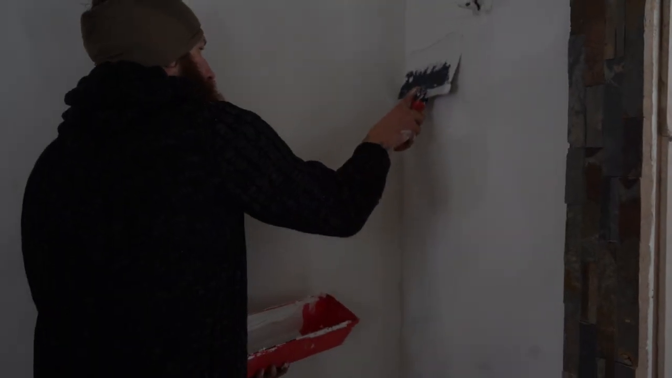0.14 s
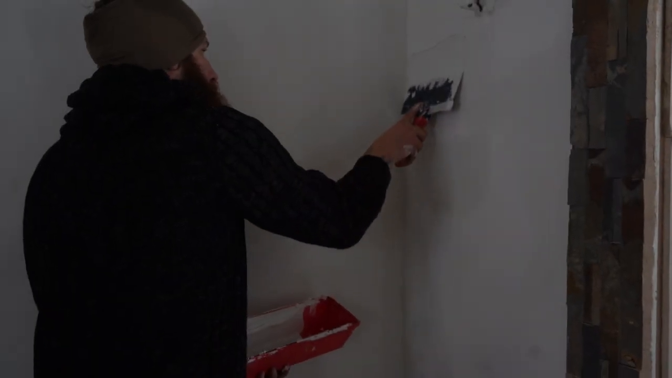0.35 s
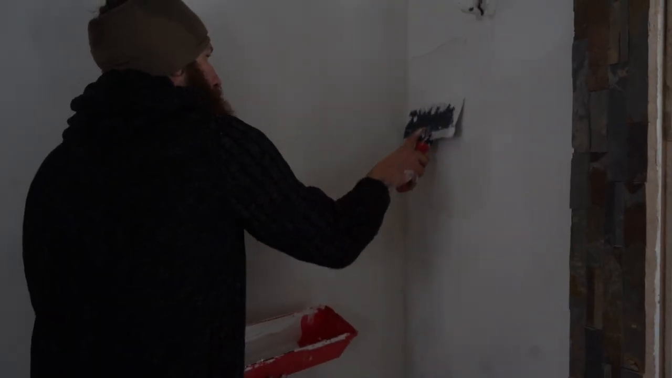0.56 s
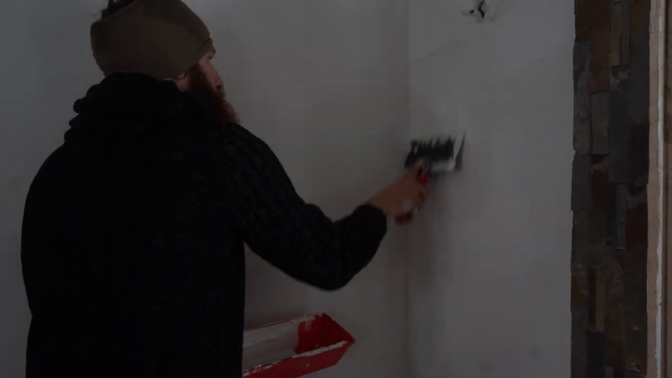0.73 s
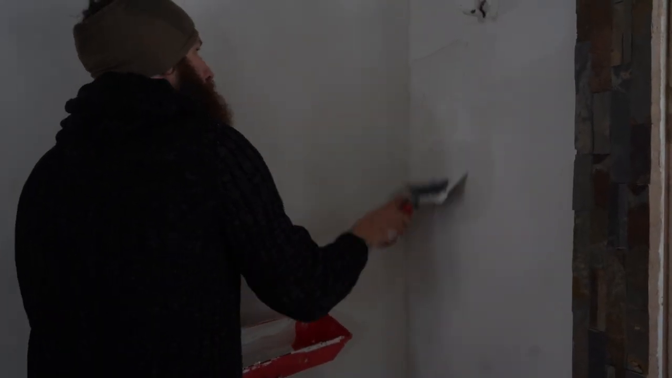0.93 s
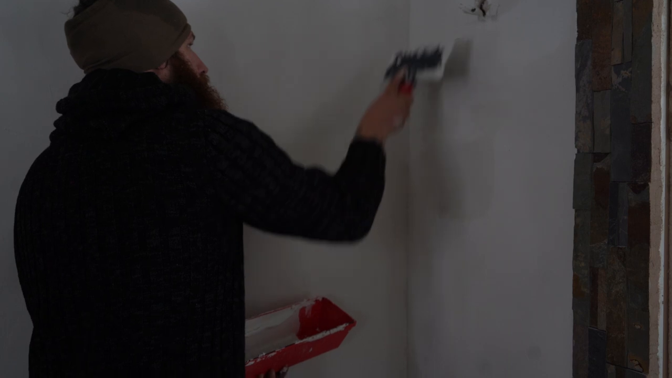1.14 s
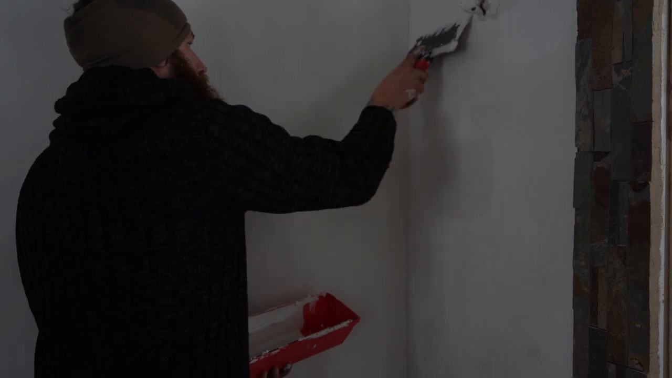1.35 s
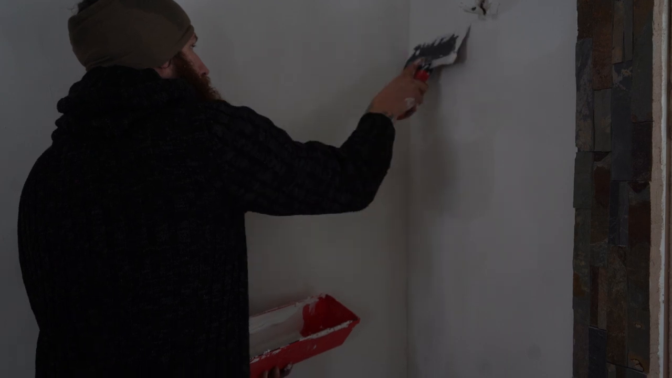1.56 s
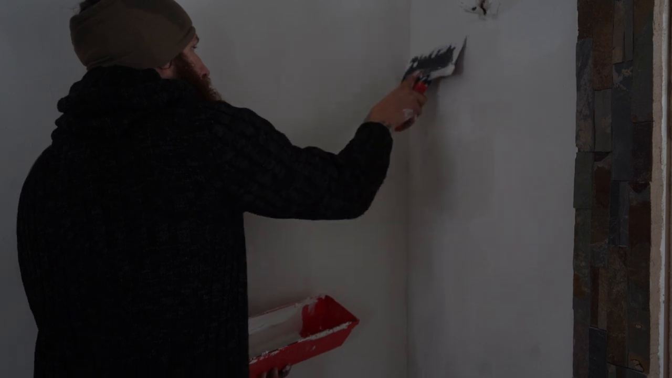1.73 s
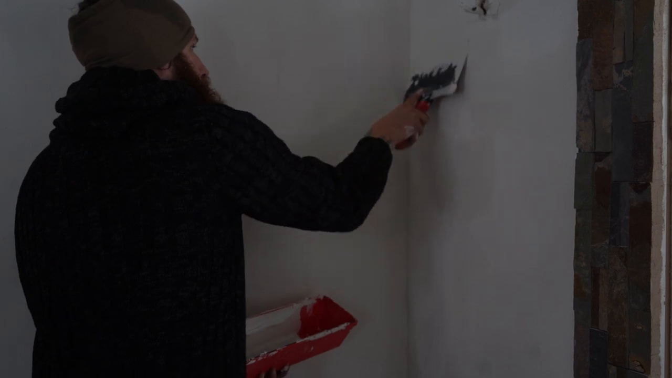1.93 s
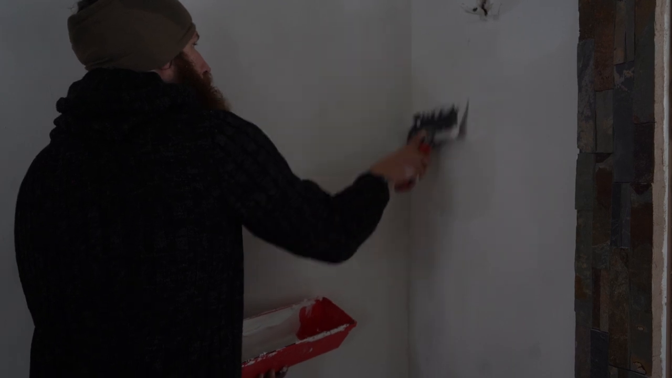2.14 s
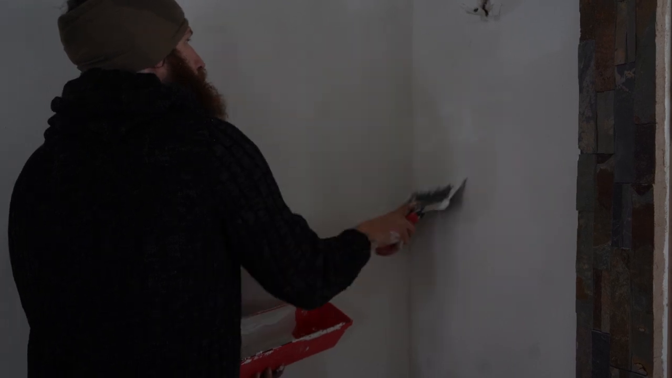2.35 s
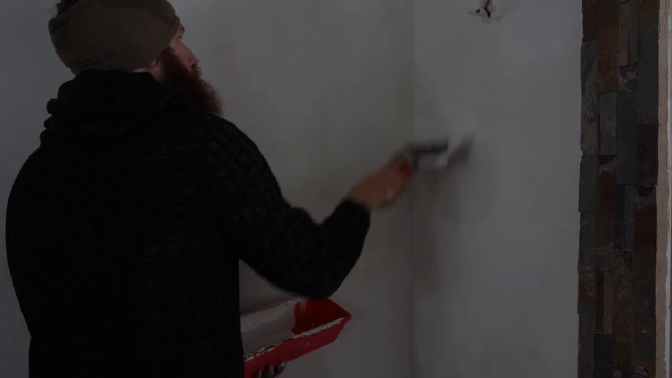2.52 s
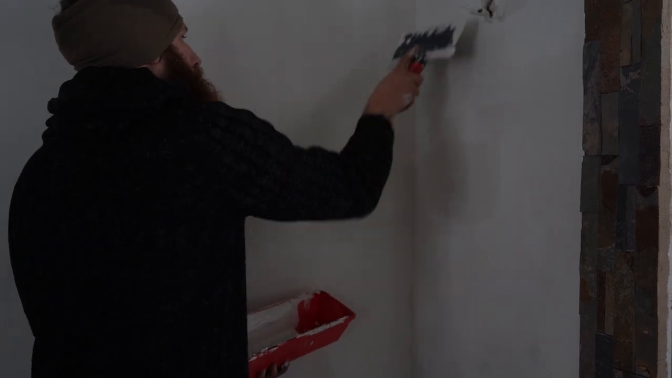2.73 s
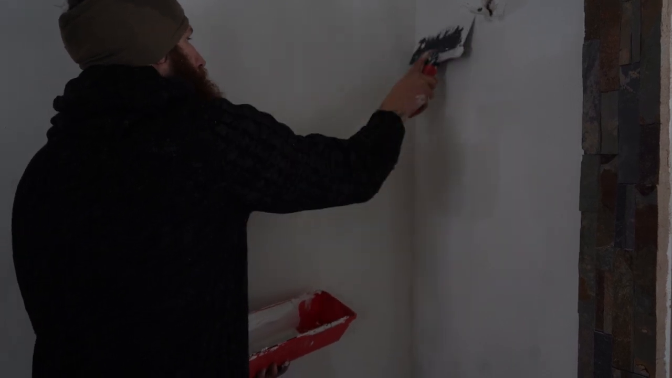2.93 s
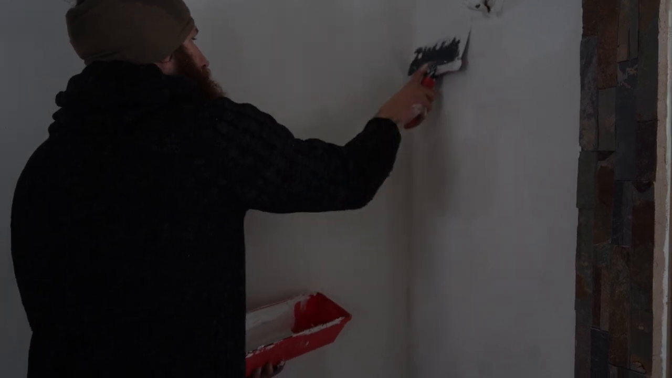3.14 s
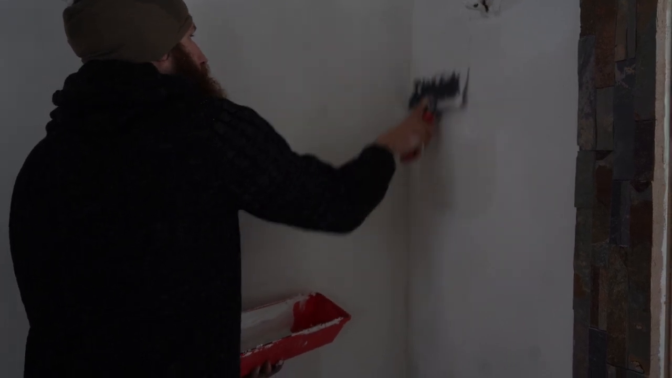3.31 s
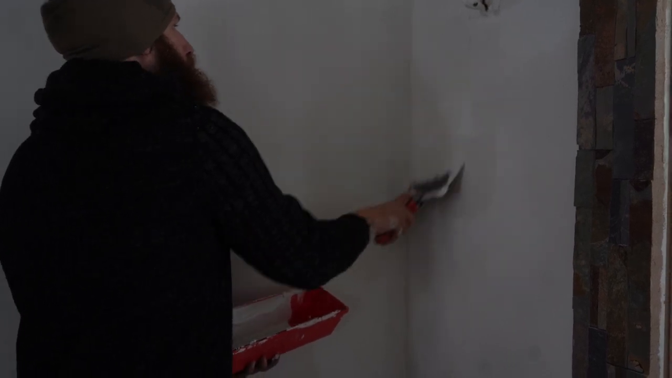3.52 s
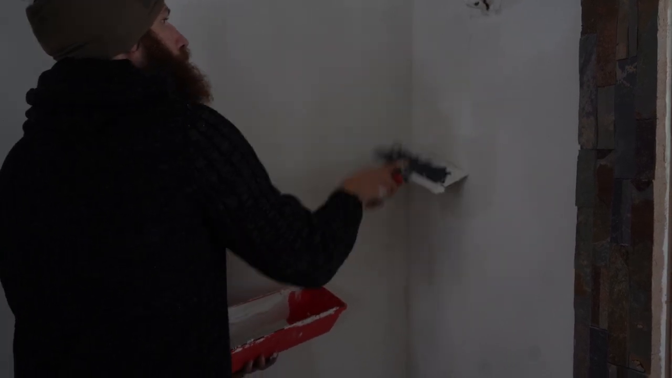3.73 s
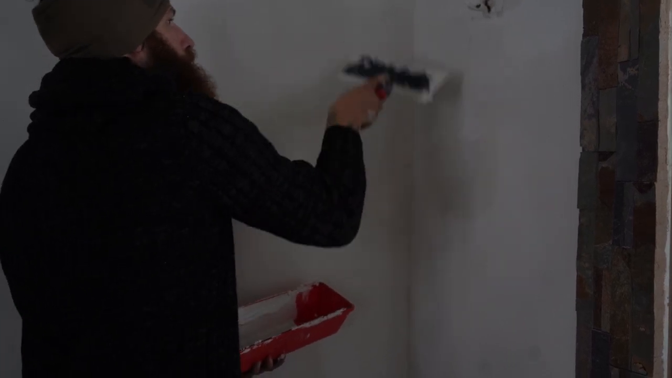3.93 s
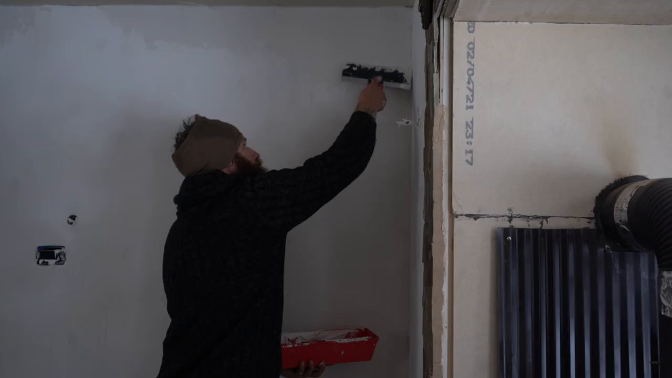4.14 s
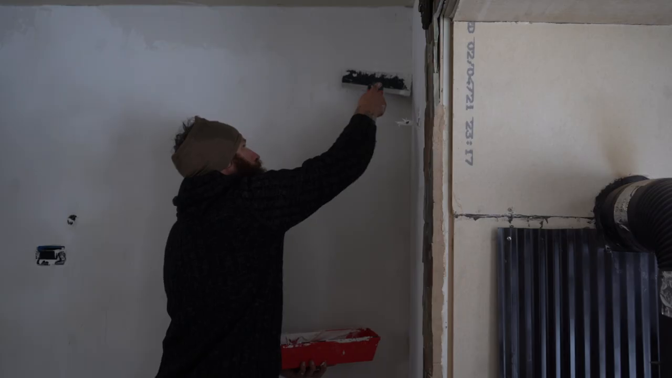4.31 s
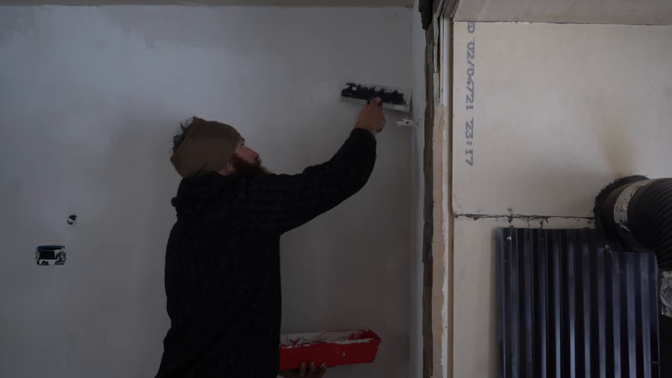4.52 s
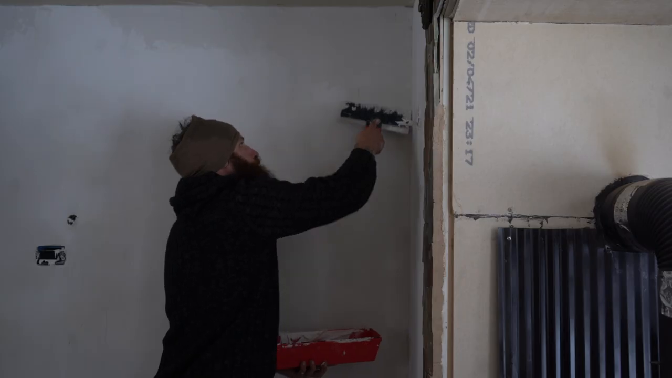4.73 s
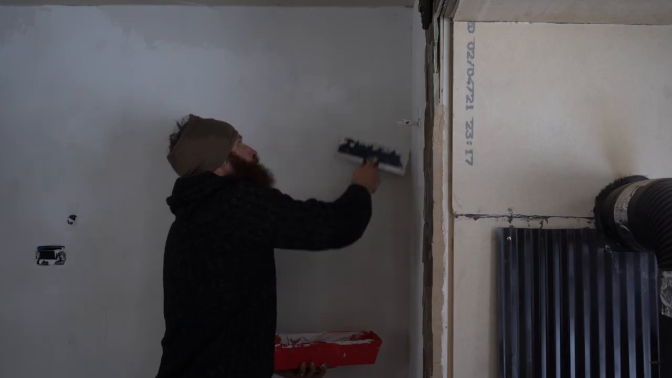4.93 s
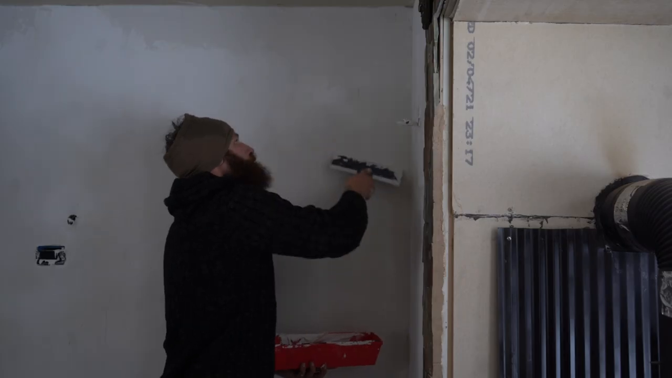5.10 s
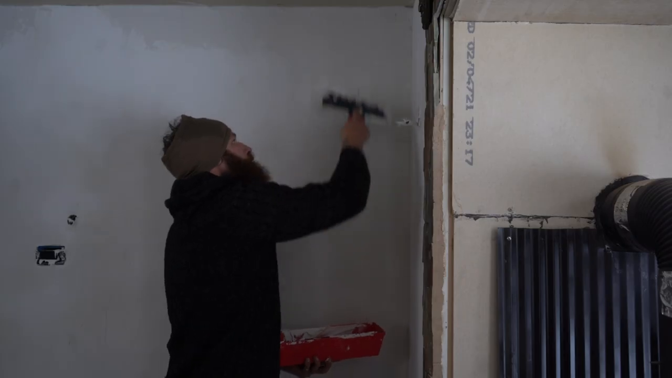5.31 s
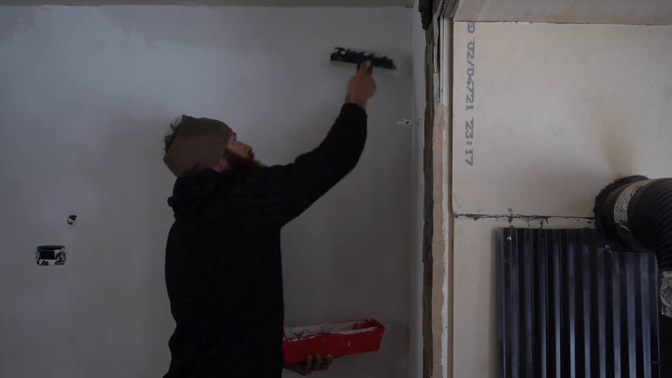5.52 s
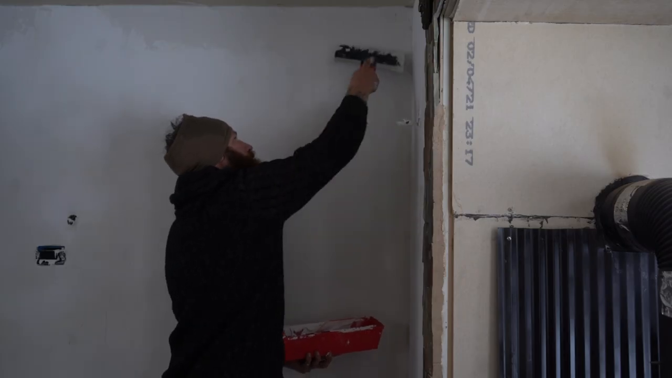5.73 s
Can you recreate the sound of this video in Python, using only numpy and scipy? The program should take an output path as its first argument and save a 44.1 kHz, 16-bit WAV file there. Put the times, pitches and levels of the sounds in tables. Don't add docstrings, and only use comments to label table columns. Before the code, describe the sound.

A steel taping knife works gritty compound on a plasterboard wall in a small, hard, briefly reverberant room, miked fairly close. Over a quiet hush with barely audible low air heaves, a faint drag swells from the start into a loud rasping flick at 0.75-0.9 s. The knife knocks the hollow panel at 1.33 s, drags softly, then flicks harder at 2.17-2.35 s, with brief metallic ringing. Another set-down and bounce come at 2.87 s; a short drag with crisp lump snaps at 3.2-3.4 s bursts into the hardest flick, around 3.4-3.55 s. Soft hollow bumps follow at 3.67 and 3.8 s, then a very faint, high gliding squeak at 3.86-4.08 s. At 4.17 s the background cuts abruptly to a steady low appliance drone with soft hiss. A fainter, farther drag has a snap near 4.5 s and flicks off at 4.85-5.15 s, leaving drone and tiny ticks.

```python
import sys
import numpy as np
from scipy import signal
from scipy.fft import rfft, irfft, next_fast_len
from scipy.io import wavfile
from scipy.ndimage import uniform_filter1d, map_coordinates

SR = 44100
rng = np.random.default_rng(int(sys.argv[2]) if len(sys.argv) > 2 else 0)


def linear_from_db(decibels):
    return 10 ** (np.asarray(decibels, float) / 20)


def store_wav(level_fs):
    pcm = np.round(np.clip(np.atleast_2d(level_fs), -1, 1) * 32767)
    wavfile.write(sys.argv[1], SR, pcm.T.astype(np.int16))


N = 258426
SCENE_CHANGE_S = 4.1714


def unit(x):
    return x / np.sqrt(np.mean(x ** 2) + 1e-20)


def along(points, hz):
    f, value = np.transpose(points)
    return np.interp(np.log(hz + 1), np.log(f + 1), value)


def wobble(rate, count=N):
    knots = rng.standard_normal(int(N * rate / SR) + 4)
    return map_coordinates(knots, [np.arange(count) * rate * N / count / SR])


def filtered(x, response):
    m = next_fast_len(N + SR // 2)
    return irfft(rfft(x, m) * response(np.fft.rfftfreq(m, 1 / SR)), m)[:N]


def shaped(x, curve):
    return unit(filtered(x, lambda hz: linear_from_db(along(curve, hz))))


def resonances(modes, f):
    total = 0
    for k, (centre, width, db) in enumerate(modes):
        damping = 1j * f * width
        total = total + (-1) ** k * linear_from_db(db) * damping / (centre * centre - f * f + damping)
    return total


def patchy(x, patchy_db):
    z = signal.stft(x, nperseg=512)[2]
    field = uniform_filter1d(rng.standard_normal(z.shape), 5, 0)
    field = uniform_filter1d(field, 8, 1)
    return signal.istft(z * linear_from_db(patchy_db * unit(field)), nperseg=512)[1][:N]


def heave():
    # f/Hz, level/dB per Hz
    pressure = [(3, -28), (7, -5), (12, -3.5), (17, -4.5), (23, -19), (30, -46.5), (45, -72), (80, -120)]
    # middle t/s, length/s, level/dB
    swells = [(0.172, 0.37, -28), (.4, 0.11, -23.5), (1.203, 0.089, -29), (1.527, 0.079, -36),
              (1.855, 0.14, -27.5), (2.034, 0.085, -31), (2.561, 0.1, -24), (2.8, 0.096, -23.5),
              (3.207, 0.075, -31), (3.602, 0.17, -30.5), (3.99, 0.15, -29)]
    s = np.arange(N) / SR
    roll = filtered(rng.standard_normal(N), lambda hz: linear_from_db(along(pressure, hz)))
    loudness = uniform_filter1d(uniform_filter1d(unit(roll) ** 2, size=4000), size=4000)
    roll = unit(roll / np.sqrt(np.abs(loudness) + 0.054))
    power = linear_from_db(np.where(s < SCENE_CHANGE_S, -38.5, -45.5)) ** 2
    for at, length, db in swells:
        power = power + linear_from_db(db) ** 2 * np.exp(-(2 * (s - at) / length) ** 2)
    opening_s = 0.026
    crest = linear_from_db(-29) * np.exp(-(s / opening_s) ** 2)
    return np.sqrt(uniform_filter1d(power, size=2200)) * roll * (1 - np.exp(-s / opening_s)) + crest


def near_hush():
    # f/Hz, level/dB per Hz
    quiet = [(26, -33), (45, -1), (59, -13.5), (91, -14.5), (157, -17), (181, -21), (243, -17.5),
             (483, -33), (573, -29), (1420, -39.5), (2420, -37), (5600, -45.5), (15600, -61.5)]
    return linear_from_db(-56.5) * shaped(patchy(rng.standard_normal(N), patchy_db=0.7), quiet)


def far_drone():
    # f/Hz, level/dB per Hz
    hum = [(18, -54), (30, 8), (110, -1.5), (150, -12.5), (200, -5), (260, -15), (430, -18), (800, -19.5),
           (1300, -24.5), (2500, -28.5), (4000, -31), (5500, -32), (7000, -40), (15600, -44)]
    # f/Hz, width/Hz, level/dB over the drone
    casing = [(201, 11, 2.5), (438, 50, 4), (588, 41, 9), (924, 20.4, 13.5), (2010, 37, 4.5),
              (2500, 97, 11)]

    def response(hz):
        power = 1 + sum(np.abs(resonances([mode], hz)) ** 2 for mode in casing)
        return linear_from_db(along(hum, hz)) * np.sqrt(power)

    return linear_from_db(-56) * unit(filtered(patchy(rng.standard_normal(N), patchy_db=1.9), response))


def background():
    s = np.arange(N) / SR
    far = s >= SCENE_CHANGE_S
    jump = -linear_from_db(-41) * far * np.exp(-np.abs(s - SCENE_CHANGE_S) / 0.0066)
    return heave() + jump + np.where(far, far_drone(), near_hush())


def squeak():
    # t/s, f/Hz
    glide = [
        (3.86, 12700),
        (3.91, 13400),
        (3.955, 12620),
        (4.01, 12800),
        (4.08, 12200),
    ]
    s = np.arange(N) / SR
    at, hz = np.transpose(glide)
    upper = uniform_filter1d(np.interp(s, at, hz), size=900)
    lower = upper * (0.758 - 0.22 * np.clip(s - at[0], 0, 1))
    on = uniform_filter1d(1. * ((s > at[0]) & (s < at[-1])), size=1300)
    tones = 0
    for f in (upper, lower):
        level_db = -86 + 4.5 * wobble(60) - 45 * np.clip(s - 4.0, 0, 1)
        tones = tones + linear_from_db(level_db) * np.sin(2 * np.pi * np.cumsum(f) / SR)
    return on * tones


def room(x):
    # f/Hz, t60/s
    decay = [(150, 0.67), (1000, 0.27), (4000, 0.31), (12000, 0.26)]
    out, hop = np.zeros(N + SR), SR // 3
    for start in range(0, N, hop):
        hz, t, z = signal.stft(rng.standard_normal(SR // 2), SR, nperseg=256)
        fade = linear_from_db(-60 * t / along(decay, hz)[:, None])
        tail = signal.istft(z * fade, SR, nperseg=256)[1]
        wet = signal.fftconvolve(x[start:start + hop], tail / np.linalg.norm(tail))
        out[start + 200:][:len(wet)] += wet
    return out[:N]


def snaps():
    # t/s, peak level/dB, t60/s, brightness f/Hz
    lumps = [(.4703, -36, 0.0253, 5000), (1.9986, -37, .028, 5000), (2.061, -49, .03, 3000),
             (2.912, -52, 0.14, 8000), (2.96, -57, .1, 7000), (3.2001, -39.5, 0.026, 4020),
             (3.244, -28.5, 0.019, 5470), (3.29, -35, 0.021, 7000), (3.4033, -27, .05, 3600),
             (3.795, -28.5, 0.044, 3360), (4.341, -51, .025, 6000), (4.497, -33.5, 0.057, 3520),
             (4.8484, -45, 0.025, 5030), (5.4497, -55, 0.065, 4980), (5.826, -57, 0.04, 6000),
             (3.845, -49.5, .05, 4000)]
    out, t = np.zeros(N + SR), np.arange(SR // 8) / SR
    for s, db, t60, bright_hz in lumps:
        puff = linear_from_db(db - 7 - 60 * t / max(t60, .002)) * rng.standard_normal(len(t))
        band = signal.butter(2, [bright_hz / 4, min(bright_hz * 1.6, 19000)], "band", fs=SR)
        out[round(s * SR):][:len(t)] += signal.lfilter(*band, puff)
    return out[:N]


def knocks():
    # t/s, tick level/dB, panel level/dB re tick, rise/s, t60/s
    bumps = [
        (1.33, -42.5, 7, 0.0008, 0.066),
        (2.869, -42, 1.5, 0.0017, 0.11),
        (2.895, -59, 2, 0.0022, .06),
        (3.672, -47, 8.5, .025, 0.07),
        (3.798, -44, 11, 0.019, 0.051),
    ]
    # f/Hz, width/Hz, level/dB
    panel = [(88, 25, 8.5), (150, 40, 12), (203, 210, 0), (300, 40, -1), (463, 250, -4.5), (654, 140, -2),
             (976, 179, -5.5), (1970, 300, -18)]
    tick, push, t = np.zeros(N + SR), np.zeros(N + SR), np.arange(SR // 3) / SR
    for s, db, panel_db, rise, t60 in bumps:
        start = round((s - rise) * SR)
        swell = np.clip(t / max(rise, 1e-4), 0, 1) ** 2
        after = np.maximum(t - rise, 0)
        tick_env = swell * linear_from_db(db - 9.5 - 60 * after / max(0.82 * t60, .005))
        push_env = swell * linear_from_db(db + panel_db + 7 - 60 * after / max(1.4 * t60, .01))
        tick[start:][:len(t)] += tick_env * rng.standard_normal(len(t))
        push[start:][:len(t)] += push_env * rng.standard_normal(len(t))
    edge = filtered(tick[:N], lambda f: resonances([(3700, 6600, 0.022)], f))
    return edge + filtered(push[:N], lambda f: resonances(panel, f))


def thuds():
    # t/s, peak level/dB, f/Hz, t60/s
    rings = [(1.328, -34, 45.7, 0.22), (1.329, -33.5, 143, 0.112), (1.33, -30.5, 300, 0.039),
             (2.87, -41, 49, 0.52), (2.866, -28.5, 160, 0.034), (2.869, -48, 313, 0.064),
             (2.895, -32, 287, 0.035), (2.903, -43, 176, 0.16), (3.657, -35, 45, 0.45),
             (3.662, -35.5, 150, 0.044), (3.692, -36, 89, 0.22), (3.788, -35.5, 426, 0.033),
             (3.791, -32, 644, 0.033), (3.796, -33, 108, 0.093), (3.811, -44, 337, 0.079)]
    out, t = np.zeros(N + SR), np.arange(SR // 3) / SR
    for s, db, hz, t60 in rings:
        envelope = linear_from_db(db - 60 * t / t60) * (1 - np.exp(-t * hz * 3))
        out[round(s * SR):][:len(t)] += envelope * np.sin(2 * np.pi * hz * t)
    return out[:N]


def stroke_controls():
    # t/s, force level/dB, lay/dB (plus = blade flat on the board), dryness/dB
    drags = [
        [(0.02, -63, -5.5, 0), (0.2, -57, 0, -2), (0.28, -60, -0.5, 1.5), (0.56, -52.5, 0.5, 3.5),
         (0.606, -44, -1, 2), (0.735, -37.5, -2, -1.5)],
        [(1.35, -80, -7, 18), (1.4, -70.5, 2, 14), (1.53, -60.5, 1, 4.5), (1.61, -56, 3.5, 4),
         (1.74, -66, 3, 0), (1.83, -57.5, -3.5, -1), (1.906, -60.5, -1.5, -2), (2.14, -51.5, -2.5, 0)],
        [(2.89, -72, -2, 9), (3.0, -71.5, -7, 2.5), (3.126, -58.5, 0, 1), (3.198, -60.5, -0.5, 2.5),
         (3.28, -52, -1.5, 0), (3.385, -49.5, -2, 1.5)],
        [(4.22, -86, 0, -2), (4.28, -74.5, -0.5, 2), (4.42, -67, 0, 3), (4.62, -66, -2.5, 0),
         (4.835, -56, 0, 0)],
    ]
    # t/s, force level/dB, lay/dB, dryness/dB
    flicks = [
        [(0.765, -30, -0.5, -2.5), (0.792, -29.5, 1.5, -3), (0.834, -33, -9, 0), (0.87, -28.5, 1, 3),
         (1.0, -89.5, 13, -23), (1.1, -82, 2, -6)],
        [(2.17, -34, -5, -1), (2.192, -30.5, -1.5, -3), (2.25, -25, 1, -2), (2.304, -31.5, -9, 4.5),
         (2.354, -33.5, 4, 1.5), (2.47, -67, 2, -4), (2.61, -68, -8, -7), (2.65, -80, 8, -9)],
        [(3.402, -26, -9, -3), (3.42, -24.5, -1.5, -4.5), (3.46, -22, -5, 3.5), (3.488, -30.5, -7, 10),
         (3.554, -39.5, 6, 3.5), (3.704, -76.5, -5, -8), (3.8, -58, 9, -5), (3.86, -66, -0.5, -13.5),
         (4.16, -80.5, 4.5, -14)],
        [(4.853, -51, 0.5, 5), (4.883, -47, 6, -4.5), (5.03, -51, 12.5, -5), (5.067, -49.5, 9.5, -6),
         (5.187, -71, 3, -4), (5.25, -73.5, 1, -12)],
    ]
    # drag level/dB, flick level/dB
    spots = [
        (2, -4.5),
        (1, 1.3),
        (-0.5, 3.5),
        (-4, -3.5),
    ]
    strokes = [drag + flick for drag, flick in zip(drags, flicks)]
    s, *cols = np.concatenate(strokes).T
    counts = [len(part) for pair in zip(drags, flicks) for part in pair]
    cols.append(np.repeat(np.ravel(spots), counts))
    now = np.arange(N) / SR
    force_db, lay_db, dry_db, spot_db = (np.interp(now, s, col) for col in cols)

    lifted = now > s[-1]
    for a, b in zip(strokes, strokes[1:]):
        leave, land = a[-1][0], b[0][0]
        if land - leave > .15:
            lifted = lifted | ((now > leave) & (now < land))
    blade_db = force_db - 40 * uniform_filter1d(1. * lifted, 400)

    over_db = force_db + 50
    board_db = -4.5 - 0.13 * over_db + 0.96 * lay_db
    grit_db = -8.5 - 0.086 * over_db + 0.77 * dry_db
    hollow_db = -10.5 - 0.39 * over_db + 0.78 * lay_db + spot_db
    return blade_db, board_db, grit_db, hollow_db


def flexing_blade(x, ring_db):
    # f/Hz, width/Hz, level/dB (unused: every mode rings at the same strength)
    blade_modes = [(1117, 110, -6), (1620, 150, -6), (1930, 130, -5), (2650, 130, -1), (3100, 70, 0),
                   (3620, 120, -1), (5550, 95, -3), (7040, 100, -11)]
    # middle t/s, length/s, f/Hz, level/dB over the scrape
    sings = [(0.284, 0.22, 1960, 8.5), (0.546, 0.088, 3900, 5), (0.65, 0.21, 1154, 6.5),
             (0.679, 0.049, 1810, 10), (0.789, 0.049, 2730, 8), (0.835, 0.024, 4100, 6),
             (0.864, 0.031, 2780, 6), (0.898, 0.1, 1620, 12), (2.186, 0.019, 2250, 14),
             (2.26, 0.034, 2450, 5.5), (2.253, 0.034, 3620, 3), (2.333, 0.065, 2520, 4.5),
             (2.38, .07, 800, 9), (2.387, .05, 1033, 12), (2.236, 0.08, 1550, -0.5), (3.32, .12, 3870, 4),
             (4.97, .14, 1660, 4.5), (3.425, 0.035, 2500, 7), (3.45, 0.045, 3100, 6.5),
             (3.46, 0.056, 1140, 9.5), (3.503, 0.09, 5500, 4.5), (4.897, 0.095, 2610, 7),
             (4.904, 0.15, 1980, 7), (4.998, 0.21, 945, 6), (2.048, 0.16, 2250, 5),
             (5.041, 0.095, 258, 5.5), (5.06, 0.068, 383, 4)]
    hz, t, z = signal.stft(x, SR, nperseg=1024)

    def peak(centre, width):
        return 1 / (1 + (2 * (hz[:, None] - centre) / width) ** 2)

    bend = 1 + 0.041 * wobble(15.0, count=len(t))
    power = 1
    for centre, width, db in blade_modes:
        strength = linear_from_db(ring_db + 3 * wobble(12, count=len(t)))
        power = power + strength ** 2 * peak(centre * bend, 4.2 * width)
    for s, length, centre, db in sings:
        moment = np.exp(-(2 * (t - s) / length) ** 4)
        power = power + linear_from_db(db + 3.5) ** 2 * moment * peak(centre, 15 + 0.028 * centre)
    return signal.istft(z * np.sqrt(power), SR, nperseg=1024)[1][:N]


def scrape():
    # f/Hz, level/dB per Hz
    steel_curve = [(1120, -40.5), (1900, -12.5), (2170, -20), (2420, -7), (3150, -4.5), (5370, -5),
                   (6500, -22), (8450, -38.5), (14300, -120)]
    # f/Hz, level/dB per Hz
    board_curve = [(380, -39), (650, -12.5), (1130, 0.5), (1320, -3.5), (1540, -2.5), (2000, -7.5),
                   (2600, -15.5), (4400, -120)]
    # f/Hz, level/dB per Hz
    grit_curve = [(3710, -41.5), (6300, -4.5), (8490, -7), (9550, -5.5), (11600, -8.5), (12800, -11),
                  (15600, -18)]
    # f/Hz, level/dB per Hz
    hollow_curve = [(47, -40), (80, -0.5), (173, -6.5), (414, 0), (478, -1.5), (700, -6.5), (910, -8),
                    (1540, -120)]
    blade_db, board_db, grit_db, hollow_db = stroke_controls()
    sizes = linear_from_db(1.8 * np.minimum(rng.exponential(1, N), 4)) * (rng.random(N) < .3)
    grains = unit(sizes * rng.standard_normal(N)) + 1.34 * rng.standard_normal(N)
    chatter = linear_from_db(1.14 * wobble(45) + 0.25 * wobble(160))
    rung = flexing_blade(patchy(grains * chatter, patchy_db=1.33), ring_db=-6)
    layers = shaped(rung, steel_curve)
    layers = layers + linear_from_db(board_db) * shaped(rung, board_curve)
    layers = layers + linear_from_db(grit_db) * shaped(rung, grit_curve)
    layers = layers + linear_from_db(hollow_db) * shaped(rung, hollow_curve)
    return linear_from_db(blade_db - 0.5) * layers


def scene():
    knife = scrape() + knocks() + thuds() + snaps()
    return (background() + squeak() + linear_from_db(-10.0) * room(knife) + knife)[None]


def roll_off(x):
    return signal.sosfilt(signal.butter(12, 15710, fs=SR, output="sos"), x)


def record(dry):
    rounded = dry[0] / (1 + np.abs(dry[0] / .3) ** 4) ** (1 / 4)
    limited = filtered(rounded, lambda hz: hz < 15720)
    return roll_off(limited[None])


dry = scene()
out = record(dry)
store_wav(out)
```